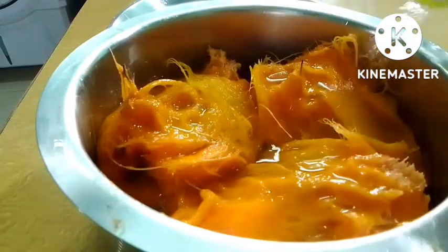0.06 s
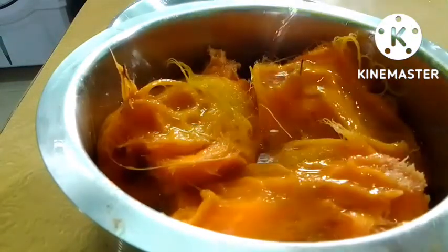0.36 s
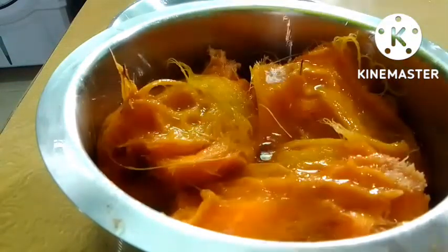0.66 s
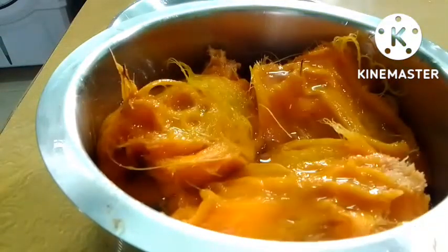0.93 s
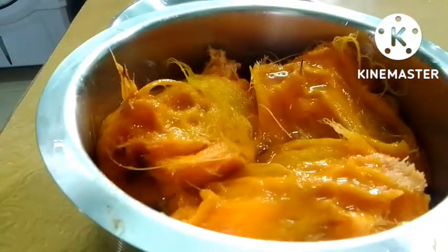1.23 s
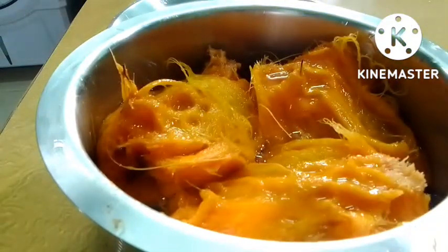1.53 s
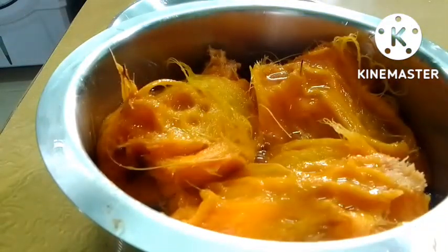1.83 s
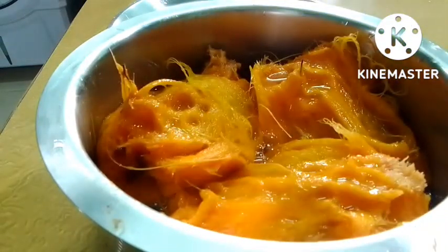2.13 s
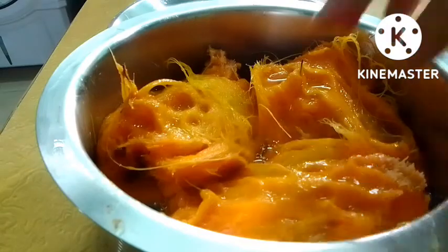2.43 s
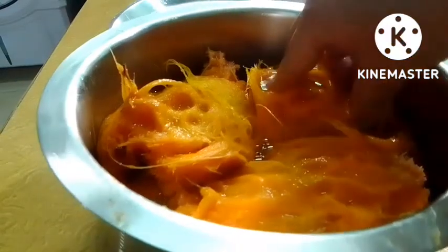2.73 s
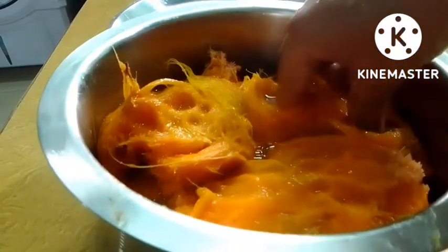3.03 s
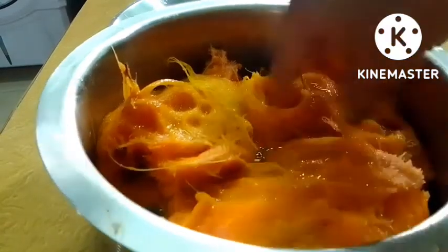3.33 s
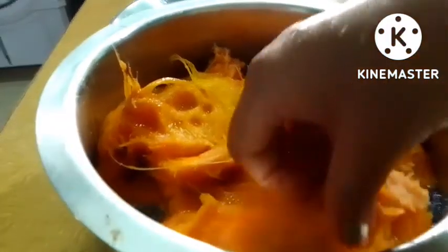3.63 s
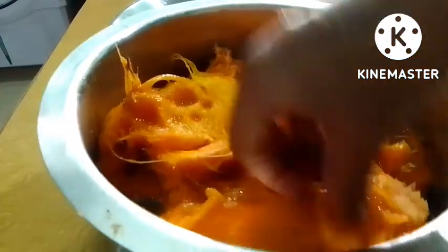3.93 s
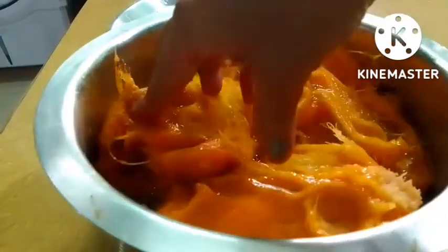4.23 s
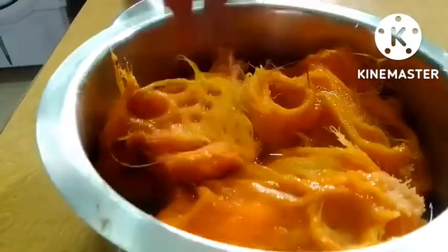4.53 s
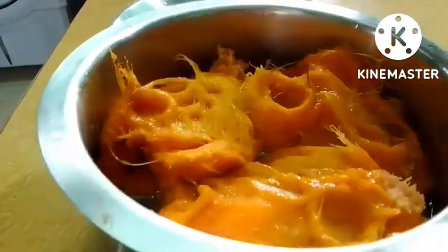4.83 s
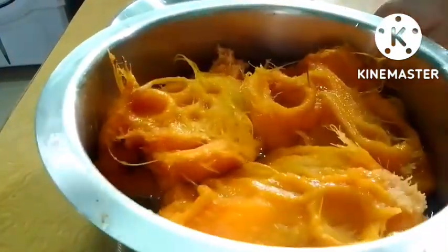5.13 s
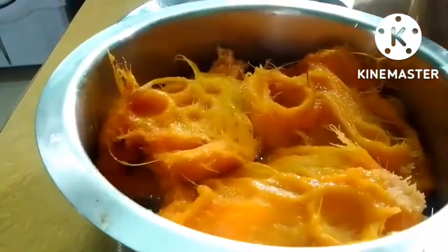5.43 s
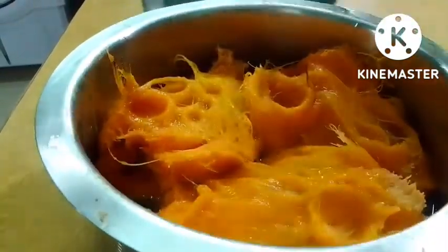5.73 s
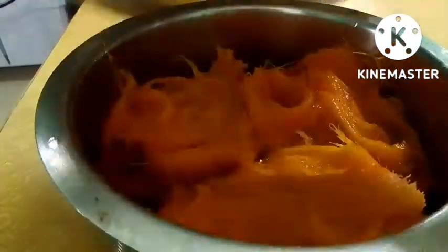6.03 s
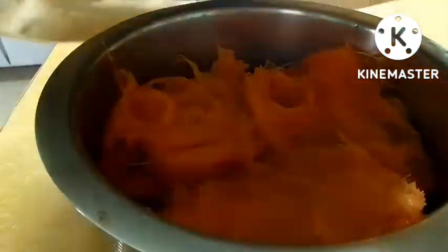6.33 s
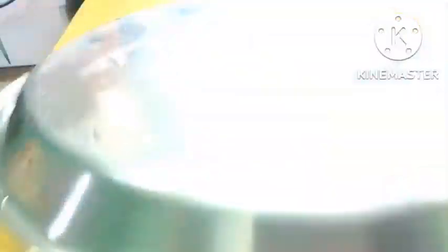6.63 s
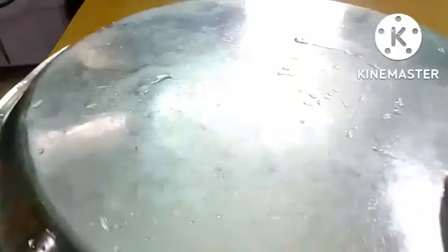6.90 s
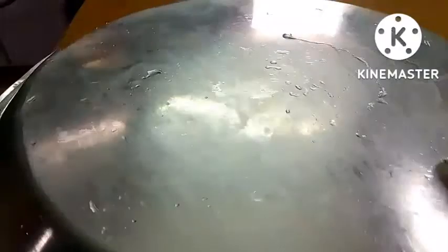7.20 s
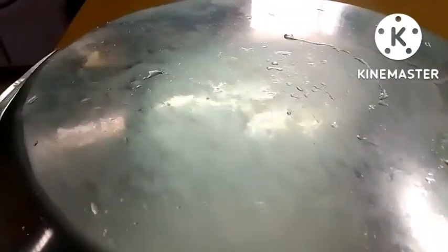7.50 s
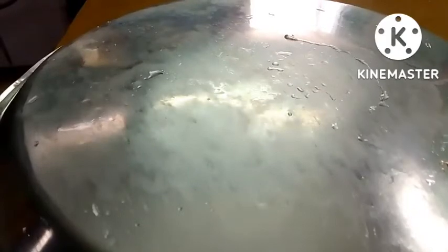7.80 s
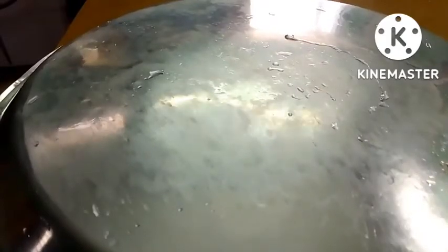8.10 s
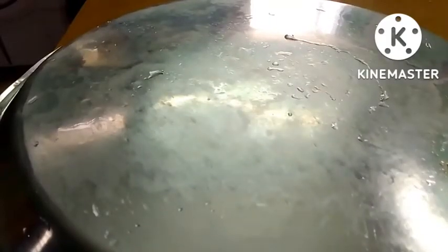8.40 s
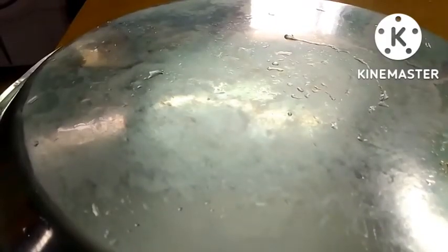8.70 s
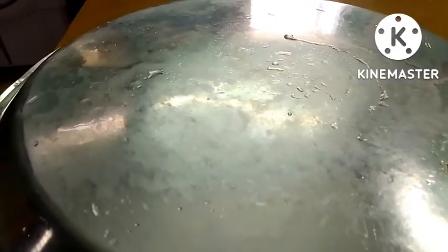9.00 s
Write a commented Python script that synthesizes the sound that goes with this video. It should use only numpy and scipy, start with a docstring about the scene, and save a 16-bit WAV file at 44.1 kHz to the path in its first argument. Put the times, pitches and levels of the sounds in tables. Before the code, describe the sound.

Close to a kitchen table in a slightly echoing room, a little water dribbles faintly onto pulp. An emptied vessel lands with a loud, rattling bang, followed by a few high metal clinks. Wet pulp smacks as a full steel bowl thuds dully. Then a steel plate scrapes as it is lifted, clangs onto the bowl and slides into place with a hollow boom. The steelware hums faintly, fading into room hush.

```python
"""Kitchen table, close by, in a hard-walled room. A last trickle runs onto fruit pulp in a steel bowl.
1.3 s: the water vessel is banged down and chatters. 2.1 s: small steel things clink.
3.7 s: a hand presses the pulp; it smacks wetly and the bowl thumps the table.
5.5 s: a steel plate is picked up. 6.4 s: it drops on the bowl's rim, bounces, slides and seats.
Steelware hums after each knock; room hush, dull rumbles and faint squeals lie underneath."""
import sys
import numpy as np
from scipy import signal
from scipy.fft import rfft, irfft, next_fast_len
from scipy.io import wavfile
from scipy.ndimage import uniform_filter1d

SR = 44100
rng = np.random.default_rng(int(sys.argv[2]) if len(sys.argv) > 2 else 0)


def bounce(signal):
    """Save signal as a 16-bit WAV file at the path given by the first command-line argument."""
    frames = np.transpose(np.atleast_2d(signal))
    limited = np.clip(frames, -1, 1)
    pcm = np.round(limited * 32767).astype(np.int16)
    wavfile.write(sys.argv[1], SR, pcm)


N = 403515

# spectrum of the pour and the rumble: (frequency [Hz], level [dB])
DULL_COLOUR = [(90, -15), (170, 2.5), (260, 7.5), (380, -4), (520, -26.5), (1500, -27), (4000, -39),
               (9000, -54.5), (15000, -59.5)]
# spectrum of steel clinks and wet ticks: (frequency [Hz], level [dB])
TICK_COLOUR = [(60, 0.5), (500, -8.5), (2000, 1), (4000, -7.5), (6000, 0), (9000, 2), (10500, -12),
               (15500, -5.5)]


def amp(db):
    """Decibels to gain."""
    return 10 ** (np.asarray(db) / 20)


def unit_rms(x):
    """Scale to rms 1."""
    return x / np.sqrt(np.mean(x ** 2) + 1e-20)


def unit_energy(x):
    """Scale to energy 1."""
    return x / (np.linalg.norm(x) + 1e-12)


def decay(t, t60_s):
    """Exponential fall, 60 dB in t60_s."""
    return np.exp(-np.log(1000) * t / t60_s)


def along(points, hz):
    """Read (frequency [Hz], value) points on a log axis."""
    point_hz, values = np.transpose(points)
    return np.interp(np.log(hz + 1), np.log(point_hz + 1), values)


def add(track, start_s, sound):
    """Mix a sound into the track."""
    part = track[max(round(start_s * SR), 0):][:len(sound)]
    part += sound[:len(part)]


def coloured(x, colour):
    """Minimum-phase filter with the given spectrum."""
    size = 4096
    gain = amp(along(colour, np.fft.rfftfreq(size, 1 / SR)))
    cepstrum = irfft(np.log(gain + 1e-6))
    cepstrum[1:size // 2] *= 2
    cepstrum[size // 2 + 1:] = 0
    impulse = irfft(np.exp(rfft(cepstrum)))
    return signal.fftconvolve(x, impulse)[:len(x)]


def burst(t60_s):
    """1 s of decaying noise, energy 1."""
    return unit_energy(rng.standard_normal(SR) * decay(np.arange(SR) / SR, t60_s))


def strokes(rows, depth_db, fall_db_per_s):
    """Envelope: each stroke starts depth_db under its peak, rises to it and dies away."""
    gain = np.zeros(N)
    for start_s, rise_s, peak_db in rows:
        age_s = np.arange(N) / SR - start_s
        under_db = np.maximum(depth_db * (1 - age_s / rise_s), fall_db_per_s * (age_s - rise_s))
        gain += (age_s >= 0) * amp(peak_db - np.abs(under_db))
    return uniform_filter1d(gain, size=256)


def in_room(x, wet_db):
    """Direct sound plus a diffuse tail; each frequency dies at its own rate."""
    # reverberation: (frequency [Hz], t60 [s])
    reverb_times = [(70, .42), (150, 0.26), (260, 1), (430, 0.87), (700, 0.61), (1400, 0.63), (4000, 0.46),
                    (8500, 0.49), (14000, 0.44)]
    hz, t, spectra = signal.stft(rng.standard_normal(SR), SR, nperseg=512)
    tail = signal.istft(spectra * decay(t, along(reverb_times, hz)[:, None]), SR, nperseg=512)[1]
    tail *= 1 - np.exp(-np.arange(len(tail)) / SR / 0.0031)  # reflections build up
    return x + amp(wet_db) * signal.fftconvolve(x, unit_energy(tail))[:len(x)]


def ring(modes, max_t60_s, scatter_db=2, detune=0.005):
    """Free modes; each contact varies strength and pitch, touch caps the decay time."""
    t = np.arange(SR) / SR
    hz, db, t60_s = np.transpose(modes)[:, :, None]
    gain = amp(db + scatter_db * rng.standard_normal(hz.shape)) * rng.choice([-1, 1], hz.shape)
    hz = hz * (1 + detune * rng.standard_normal(hz.shape))
    partials = gain * np.sin(2 * np.pi * hz * t) * decay(t, np.minimum(t60_s, max_t60_s))
    return unit_energy(partials.sum(axis=0))


def rub(force, colour, modes, slips_per_s, ring_db, max_t60_s, wet_db):
    """Friction: many tiny uneven slips excite an object."""
    slips = (rng.random(N) < slips_per_s / SR) * rng.standard_normal(N)
    scrape = unit_rms(coloured(slips, colour))
    ringing = unit_rms(signal.fftconvolve(slips, ring(modes, max_t60_s))[:N])
    return in_room(unit_rms(scrape + amp(ring_db) * ringing) * force, wet_db)


def blows(hits, colour, modes, balance_db, crack_t60_s, ring_db, max_t60_s, wet_db):
    """Impacts: crack plus ring; a harder contact has less boom and thud."""
    # boom, thud, clang, edge bands: (cutoff [Hz], filter type)
    bands = [(170, "lowpass"), ((170, 500), "bandpass"), ((500, 3000), "bandpass"), (3000, "highpass")]
    # gain per hardness: (boom, thud, clang, edge) [dB/dB]
    tilts = [-1.12, -0.74, 0.081, 0.021]
    out = np.zeros(N)
    for start_s, db, hardness_db in hits:
        crack = unit_energy(coloured(burst(crack_t60_s), colour))
        sound = in_room(crack + amp(ring_db) * ring(modes, max_t60_s), wet_db)
        for share_db, tilt, (cutoff_hz, kind) in zip(balance_db, tilts, bands):
            band = signal.sosfilt(signal.butter(4, cutoff_hz, kind, fs=SR, output="sos"), sound)
            onset_rms = np.sqrt(np.mean(band[:SR // 20] ** 2))
            add(out, start_s, amp(db + share_db + tilt * hardness_db) * band / onset_rms)
    return out


def air():
    """Steady room hush; a dull rumble swells now and then."""
    # hush spectrum: (frequency [Hz], level [dB])
    hush_colour = [(12, -34.5), (20, -4), (22, -18), (32, -32), (64, -22.5), (140, -33.5), (171, -26.5),
                   (213, -49.5), (238, -34), (324, -42.5), (372, -34), (491, -47.5), (1300, -40),
                   (1720, -50.5), (15500, -84)]
    # rumbles: (start [s], rise [s], peak [dB])
    swells = [(2.15, 0.2, -56.5), (7.2, 0.17, -54), (7.8, 0.21, -55), (8.15, 0.04, -69), (8.32, .06, -67.5)]
    rumble = unit_rms(coloured(rng.standard_normal(N), DULL_COLOUR))
    hush = unit_rms(coloured(rng.standard_normal(N), hush_colour))
    return amp(-60.5) * hush + strokes(swells, depth_db=10, fall_db_per_s=47.5) * rumble


def squeals(rise_s=0.038, width_hz=200):
    """Faint narrow noise bands rise quickly and fade."""
    # squeals: (start [s], peak [dB], pitch [Hz])
    events = [(1.755, -53.5, 1484), (2.26, -66.5, 2004), (4.26, -62, 1480), (7.254, -65.5, 1995),
              (7.775, -57, 1550), (7.92, -72.5, 2367)]
    hz = np.fft.rfftfreq(2 * SR, 1 / SR)
    out = np.zeros(N)
    for start_s, db, pitch_hz in events:
        band = irfft(rfft(rng.standard_normal(2 * SR)) / (1 + (2 * (hz - pitch_hz) / width_hz) ** 2))
        envelope = strokes([(start_s, rise_s, db)], depth_db=13.5, fall_db_per_s=65)
        out += np.resize(unit_rms(band), N) * envelope
    return out


def steelware_hum(shaking, t60_s, gain_db):
    """Steelware on the table picks up each knock and hums on faintly."""
    # blurred resonances: (centre [Hz], width [Hz], level [dB])
    resonances = [(1540, 300, -11), (1975, 170, -3), (2300, 130, -1.5), (2796, 155, -1), (3103, 180, -5.5),
                  (3390, 110, -9.5), (4310, 150, -3), (4730, 240, -3.5), (5440, 170, -9), (5710, 220, -8.5),
                  (6480, 240, -9.5), (7100, 200, -8), (7600, 220, -6), (8300, 380, -8.5)]
    hz = np.fft.rfftfreq(2 * SR, 1 / SR)
    shape = sum(amp(db) * np.exp(-2 * ((hz - centre) / width) ** 2) for centre, width, db in resonances)
    tail = irfft(rfft(rng.standard_normal(2 * SR)) * shape) * decay(np.arange(2 * SR) / SR, t60_s)
    return amp(gain_db) * signal.fftconvolve(shaking, unit_energy(tail))[:N]


def droplet(hz, decay_cycles, glide, splash_db):
    """A tiny bubble rings and rises in pitch, with a wet tick."""
    age = np.arange(SR) / SR * hz / decay_cycles
    pitch_hz = hz * (1 + glide * np.tanh(age))
    tone = np.sin(2 * np.pi * np.cumsum(pitch_hz) / SR) * np.exp(-age)
    tick = coloured(burst(t60_s=0.007), TICK_COLOUR)
    return in_room(tone + amp(splash_db) * tick, wet_db=-3.5)


def water():
    """A thin stream drums softly on the pulp, with drips and bubbles."""
    # stream: (start [s], rise [s], peak [dB])
    pour = [(0.0, .35, -53)]
    # drips and bubbles in the bowl: (time [s], level [dB], pitch [Hz])
    drips = [(0.0343, -60.5, 7700), (0.2807, -65.5, 6300), (0.451, -68, 6200), (0.475, -68.5, 5800),
             (0.5511, -72, 6050)]
    bubbles = [(0.0354, -52.5, 1260), (0.5781, -53, 1292)]
    flow = strokes(pour, depth_db=7.5, fall_db_per_s=44)
    out = flow * unit_rms(coloured(rng.standard_normal(N), DULL_COLOUR))
    for start_s, db, hz in drips:
        add(out, start_s, amp(db) * droplet(hz, decay_cycles=20, glide=0.12, splash_db=16))
    for start_s, db, hz in bubbles:
        add(out, start_s, amp(db) * droplet(hz, decay_cycles=4.5, glide=0.092, splash_db=-15))
    return out


def pulp():
    """Pressed wet pulp smacks in short noise bursts."""
    # smacks: (time [s], dry peak [dB])
    smacks = [(3.6973, -53), (3.7363, -42.5), (3.7865, -55), (3.8443, -45), (4.045, -59)]
    # smack spectrum: (frequency [Hz], level [dB])
    colour = [(500, -12), (2000, 4), (5500, -10), (8800, -0.5), (11000, -18.5), (15500, -16)]
    out = np.zeros(N)
    for start_s, db in smacks:
        smack = coloured(burst(t60_s=0.013), colour)
        add(out, start_s, amp(db) * in_room(smack, wet_db=-2.5) / np.abs(smack).max())
    return out


def clinks():
    """Small steel touches steel, skids and touches again; a few very high partials ring."""
    # taps: (time [s], dry peak [dB], crack [dB], brightness [dB/octave])
    taps = [(2.14, -27, 0, 1), (2.2623, -41.5, -15, -21), (2.3696, -37, -4.5, 20),
            (4.6983, -47.5, -20, -21.5)]
    # skids: (start [s], rise [s], peak [dB])
    skids = [(2.145, .004, -53), (2.19, 0.077, -55.5)]
    # small steel modes: (frequency [Hz], level [dB], t60 [s])
    modes = [(5970, 2, 0.055), (5930, -15.5, 0.079), (8900, 0, 0.13), (8950, 0, 0.069), (8600, -7, 0.1),
             (11400, -15, 0.12), (12450, -30, 0.18), (14230, -28, .13), (15350, -21.5, .1)]
    force = strokes(skids, depth_db=4.5, fall_db_per_s=347)
    out = rub(force, TICK_COLOUR, modes, slips_per_s=700, ring_db=5, max_t60_s=0.019, wet_db=-4)
    for start_s, db, crack_db, db_per_octave in taps:
        tilted = [(hz, mode_db + db_per_octave * np.log2(hz), t60_s) for hz, mode_db, t60_s in modes]
        tap = ring(tilted, max_t60_s=0.35)
        tap += amp(crack_db) * unit_energy(coloured(burst(t60_s=0.0087), TICK_COLOUR))
        add(out, start_s, amp(db) * in_room(tap, wet_db=-5.5) / np.abs(tap).max())
    return out


def bowl():
    """Pressed by the hand, the full bowl rocks and thumps the table."""
    # thumps: (time [s], level [dB], hardness [dB])
    hits = [(3.684, -37, 2), (4.176, -58.5, -11), (4.285, -45.5, -2), (5.457, -68, 1.5)]
    # contact spectrum: (frequency [Hz], level [dB])
    colour = [(25, -37.5), (55, -4), (85, 3.5), (160, 0.5), (205, -11.5), (280, -2), (390, -9.5),
              (540, -20), (780, -22), (980, -26.5), (1450, -26), (1900, -43), (3800, -59), (15500, -77.5)]
    # full bowl modes: (frequency [Hz], level [dB], t60 [s])
    modes = [(61.3, -8, 0.67), (78, 2, 0.11), (99.5, 6.5, 0.47), (138, -6, 0.24), (162, 6, 0.23),
             (265, -8.5, 0.1), (296, -6, 0.092), (383, -14, 0.077)]
    # band shares: (boom, thud, clang, edge) [dB]
    balance_db = [13, 8, -0.5, -24]
    return blows(hits, colour, modes, balance_db,
                 crack_t60_s=0.0092, ring_db=-3, max_t60_s=0.59, wet_db=1)


def plate_lift():
    """The plate drags and clatters as it is picked up, then hums on in the hand."""
    # drags: (start [s], rise [s], peak [dB])
    drags = [(5.5, .05, -47), (5.69, 0.022, -50)]
    # knocks: (time [s], level [dB], hardness [dB])
    hits = [(5.493, -58, -4.5), (5.538, -56.5, -6), (5.802, -40, 7), (5.833, -39.5, -1.5)]
    # contact spectra: (frequency [Hz], level [dB])
    drag_colour = [(88, -51), (150, -19.5), (241, -0.5), (327, -5.5), (366, -11.5), (505, -17.5), (588, -8),
                   (1020, -42), (1440, -26), (1610, -10), (2100, -36.5), (2790, -25), (3570, -48.5),
                   (8390, -41.5), (14000, -74.5)]
    hit_colour = [(59, -40), (100, -15.5), (258, -10.5), (347, -8), (378, -13.5), (614, -7), (808, -7.5),
                  (1110, -14.5), (1290, -4.5), (1730, -16), (2090, -26.5), (3180, -27.5), (3850, -29),
                  (8230, -33), (15500, -60)]
    # plate modes: (frequency [Hz], level [dB], t60 [s])
    modes = [(215.7, -3.5, 0.52), (240.7, -12, 1.2), (262.4, -2.5, 1.3), (367, -5, 0.62),
             (567, -13.5, 0.44), (674, -23, .4), (826, -16.5, .6), (950, -16, 0.68), (1264, -9, 0.46),
             (1341, -1.5, 0.5), (1740, -7, 0.33), (2236, -29.5, 0.79), (3204, -8.5, 0.26),
             (5780, -18.5, .26), (7500, -40.5, 0.29)]
    # band shares: (boom, thud, clang, edge) [dB]
    balance_db = [-7, -0.5, -0.5, -10]
    force = strokes(drags, depth_db=15.5, fall_db_per_s=131)
    drag = rub(force, drag_colour, modes, slips_per_s=610, ring_db=-19, max_t60_s=0.28, wet_db=-2.5)
    return drag + blows(hits, hit_colour, modes, balance_db,
                        crack_t60_s=0.086, ring_db=-4.5, max_t60_s=np.inf, wet_db=1)


def bounces(first_hit, count, flight_s=0.033, flight_ratio=0.81, loss_db=3, hardness_db=13):
    """A drop and its rebounds, each sooner and weaker; hard, as only the thin edge lands."""
    start_s, db, _ = first_hit
    times_s = start_s + np.cumsum(flight_s * flight_ratio ** np.arange(count))
    return [first_hit] + [(t, db - loss_db * k, hardness_db) for k, t in enumerate(times_s, 1)]


def plate_on_rim(seated_s=6.9):
    """The plate bounces on the rim, slides and seats; the closed bowl booms hollowly."""
    # the drop; the touches, catches and seating knocks: (time [s], level [dB], hardness [dB])
    release = (6.451, -32.5, -3)
    hits = [(6.394, -41.5, -17), (6.457, -35, -1), (6.644, -46.5, 7), (6.808, -49.5, 6), (6.822, -52, -11),
            (6.868, -62, -6), (6.926, -50.5, -10), (6.948, -43, 0), (6.984, -49.5, 3.5)]
    # pushes along the rim: (start [s], rise [s], peak [dB])
    pushes = [(6.55, .41, -41.5), (7.07, 0.054, -52)]
    # contact spectra: (frequency [Hz], level [dB])
    slide_colour = [(120, -28), (200, -6), (268, -11.5), (327, -14), (371, -4.5), (607, -18), (715, -21.5),
                    (906, -20.5), (1070, -14), (1230, -18), (1350, -16), (2060, -23), (2210, -25),
                    (8660, -27), (10200, -35.5), (15500, -41)]
    loose_colour = [(21, -61.5), (35, -31), (65, -8), (193, -15.5), (269, 10), (338, -4.5), (375, -9),
                    (564, -12.5), (746, -18), (915, -18.5), (1520, -16.5), (2070, -30.5), (2470, -32),
                    (8850, -35), (10500, -46.5), (15500, -51.5)]
    seated_colour = [(41, -68), (70, -32), (123, -16), (151, -0.5), (202, -12), (237, -2.5), (318, -6.5),
                     (390, -10.5), (511, -33), (768, -18), (1550, -16), (1770, -28), (7350, -68),
                     (8420, -44.5), (15500, -88)]
    # modes of the plate on the bowl: (frequency [Hz], level [dB], t60 [s])
    loose_modes = [(265.4, -12, 0.39), (315, -7, 0.24), (377, 3, 0.74), (453.5, -4.5, 0.84),
                   (586, -9.5, 0.31), (674, -8.5, 0.36), (710, -5.5, 0.45), (753, -0.5, 0.24),
                   (846, -11, 0.56), (1106, -6, 0.47), (1300, -8.5, 0.45), (1347, -11, 0.94),
                   (1537, -11, 0.38), (1600, -9.5, 0.16), (2260, -15, 0.19), (2560, -17.5, 0.22),
                   (2920, -22, .2), (3230, -19.5, 0.34), (3540, -29, .3), (4630, -27.5, 0.2),
                   (6840, -27.5, 0.25), (7790, -22, 0.43), (8610, -22.5, 0.33)]
    seated_modes = [(173, -3, 0.13), (198, -17, 0.094), (240.7, 1, 0.31), (268, -11, 0.19),
                    (337, -11, 0.12), (380, -5, 0.53), (432.4, -13.5, 0.2), (1168, -13, 0.29),
                    (1465, -14.5, 0.26), (1630, -24, 0.45)]
    # band shares: (boom, thud, clang, edge) [dB]
    loose_balance_db = [-7.5, -1, -0.5, -8.5]
    seated_balance_db = [2, 17, 0, -6]
    force = strokes(pushes, depth_db=16, fall_db_per_s=230)
    slide = rub(force, slide_colour, loose_modes,
                slips_per_s=1800, ring_db=-18, max_t60_s=0.3, wet_db=-3.5)
    landing = bounces(release, count=4) + [hit for hit in hits if hit[0] < seated_s]
    seating = [hit for hit in hits if hit[0] >= seated_s]
    clangs = blows(landing, loose_colour, loose_modes, loose_balance_db,
                   crack_t60_s=0.061, ring_db=-2.5, max_t60_s=0.9, wet_db=-3)
    booms = blows(seating, seated_colour, seated_modes, seated_balance_db,
                  crack_t60_s=0.081, ring_db=7, max_t60_s=0.4, wet_db=-13)
    return slide + clangs + booms


def vessel():
    """The emptied vessel lands on its edge, chatters and drops flat."""
    # blows on the table: (time [s], level [dB], hardness [dB])
    hits = [(1.271, -25, 1), (1.394, -32.5, -1.5), (1.407, -27.5, 0)]
    # chatter on its base: (start [s], rise [s], peak [dB])
    rattle = [(1.28, 0.13, -27)]
    # contact spectrum: (frequency [Hz], level [dB])
    colour = [(30, -49), (60, -9), (120, -2), (200, -7), (270, 0.5), (400, -6), (560, -8.5), (800, 2),
              (1000, 2), (1350, 1), (1900, -16.5), (2700, -23.5), (4200, -33.5), (8500, -45), (10500, -60),
              (15500, -68)]
    # vessel modes: (frequency [Hz], level [dB], t60 [s])
    modes = [(176, 0, 0.31), (311, 3.5, 1.6), (365, -4.5, 1.7), (458, -2.5, 0.48), (592, -3, 0.59),
             (801, -8.5, 0.27), (770, -3.5, 0.25), (890, -8.5, 0.44), (1020, 0.5, 0.54), (1337, 5, 0.54),
             (1423, 1, 0.34), (2600, -21, 0.25)]
    # band shares: (boom, thud, clang, edge) [dB]
    balance_db = [-7.5, -4, -1.5, -24.5]
    force = strokes(rattle, depth_db=-0.5, fall_db_per_s=402)
    chatter = rub(force, colour, modes, slips_per_s=610, ring_db=-8, max_t60_s=0.25, wet_db=-11)
    return chatter + blows(hits, colour, modes, balance_db,
                           crack_t60_s=0.03, ring_db=-13.5, max_t60_s=0.29, wet_db=-4)


def scene():
    """Mono mix; thumps through the table top shake the steelware most."""
    knocks = vessel() + clinks() + plate_lift() + plate_on_rim()
    thumps = bowl()
    hum = steelware_hum(knocks + amp(16) * thumps, t60_s=2.0, gain_db=-23.5)
    return (water() + pulp() + knocks + thumps + hum + squeals() + air())[None]


def record(dry):
    """The phone's band limit and small constant offset."""
    top_hz, taper_hz, offset = 15600, 400, 0.0131
    size = next_fast_len(N + SR)
    hz = np.fft.rfftfreq(size, 1 / SR)
    passband = np.clip((top_hz - hz) / taper_hz + 0.5, 0, 1)
    return irfft(rfft(dry, size) * passband, size)[:, :N] + offset


dry = scene()
out = record(dry)
bounce(out)
```